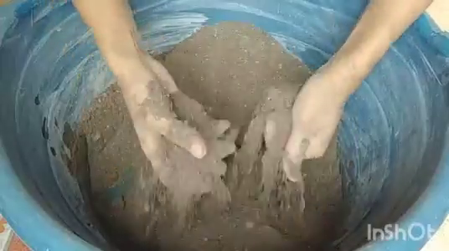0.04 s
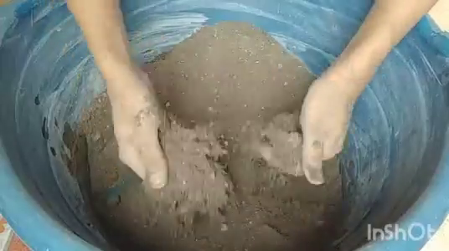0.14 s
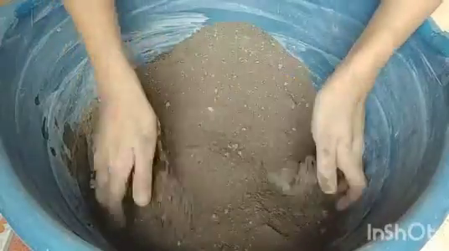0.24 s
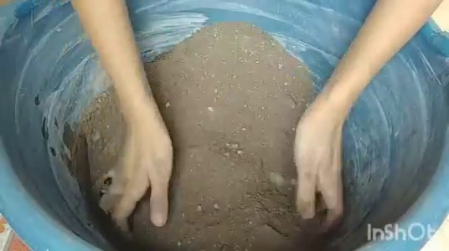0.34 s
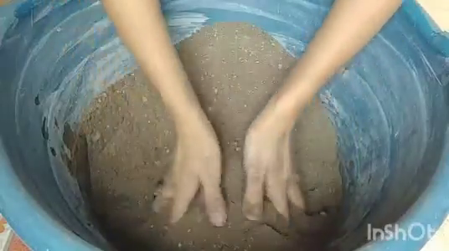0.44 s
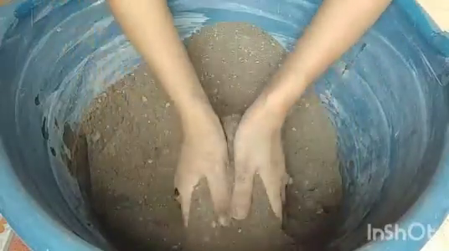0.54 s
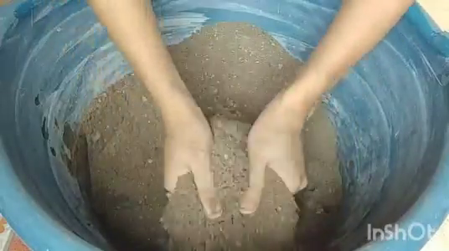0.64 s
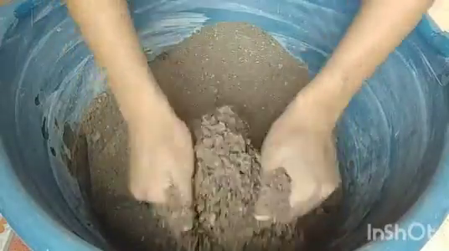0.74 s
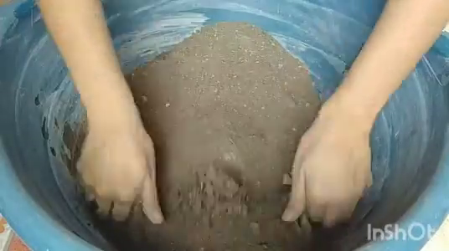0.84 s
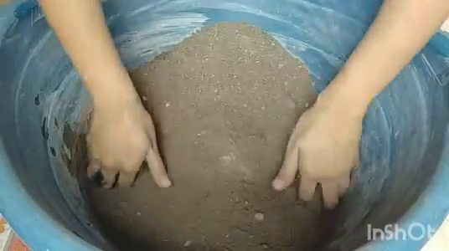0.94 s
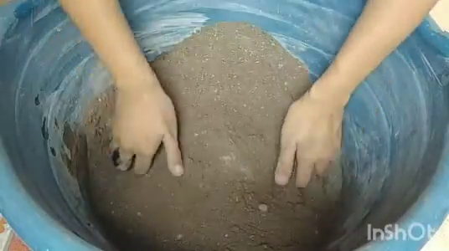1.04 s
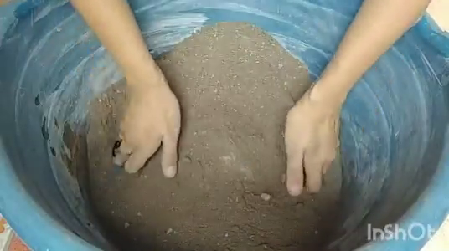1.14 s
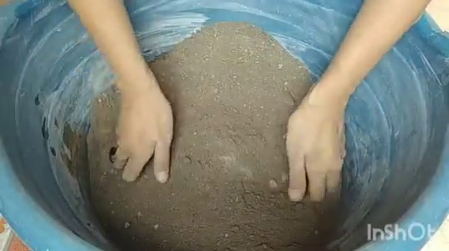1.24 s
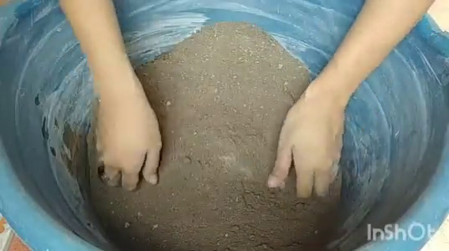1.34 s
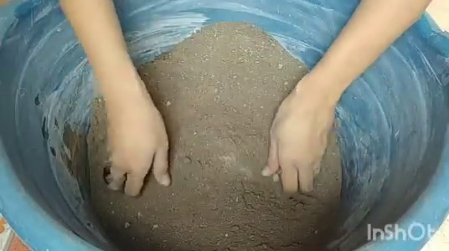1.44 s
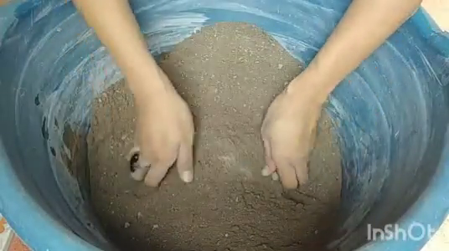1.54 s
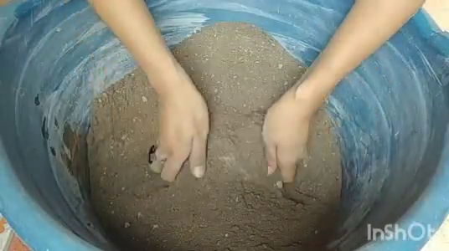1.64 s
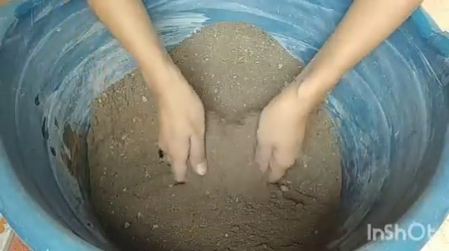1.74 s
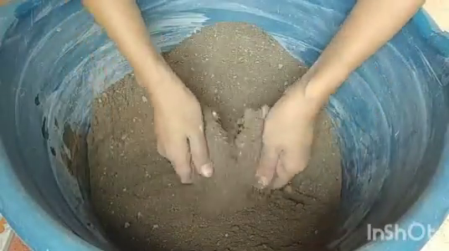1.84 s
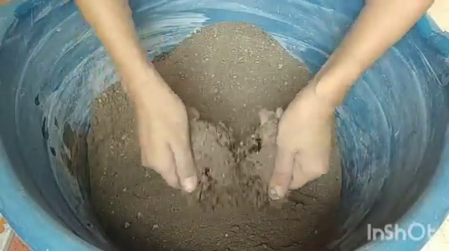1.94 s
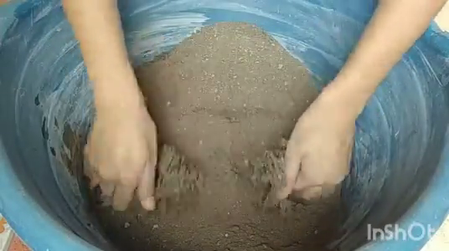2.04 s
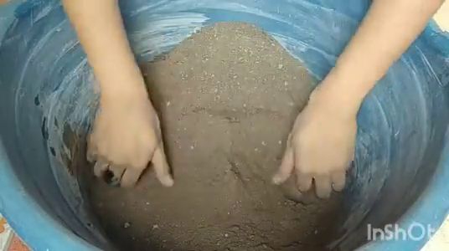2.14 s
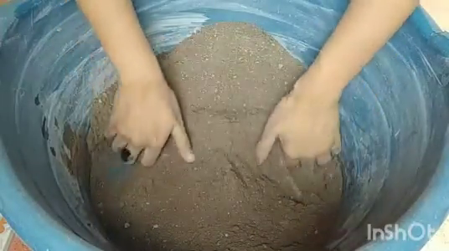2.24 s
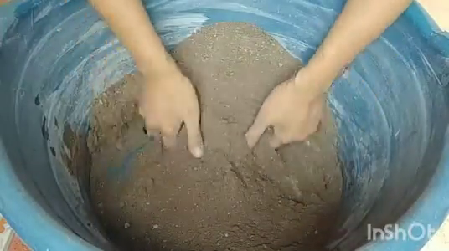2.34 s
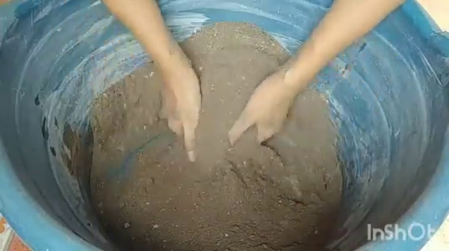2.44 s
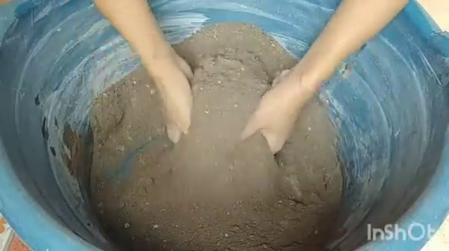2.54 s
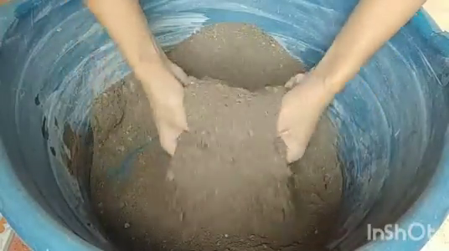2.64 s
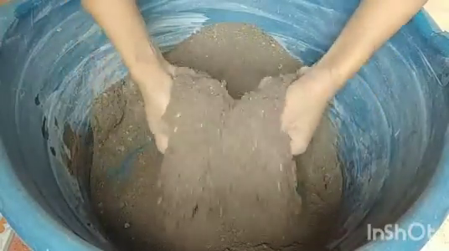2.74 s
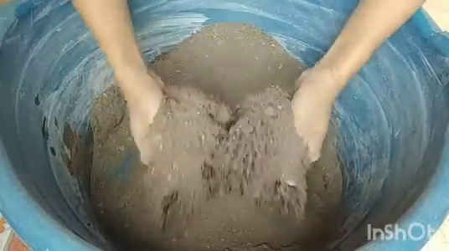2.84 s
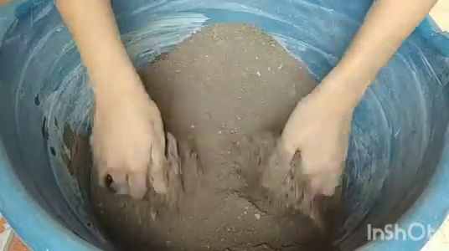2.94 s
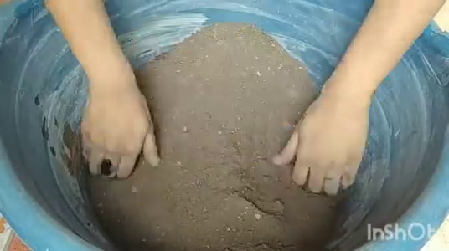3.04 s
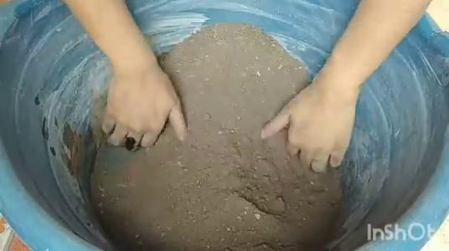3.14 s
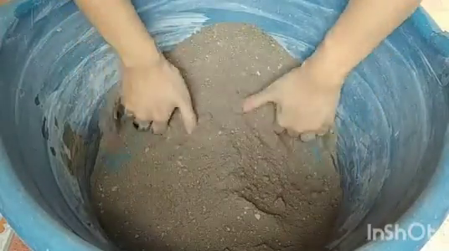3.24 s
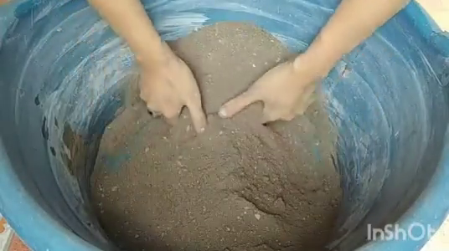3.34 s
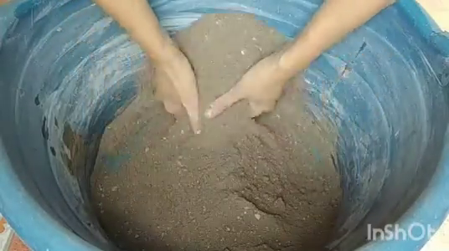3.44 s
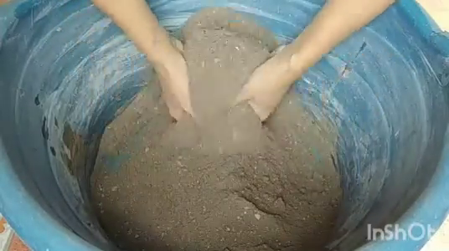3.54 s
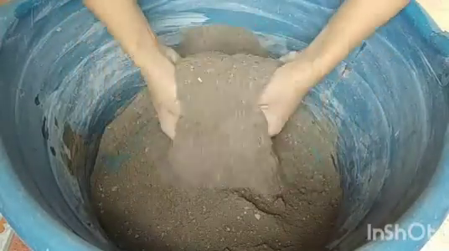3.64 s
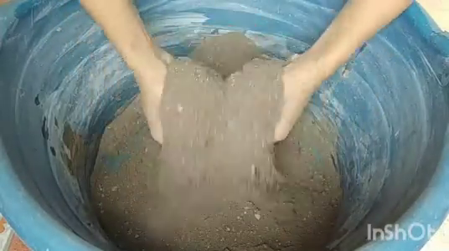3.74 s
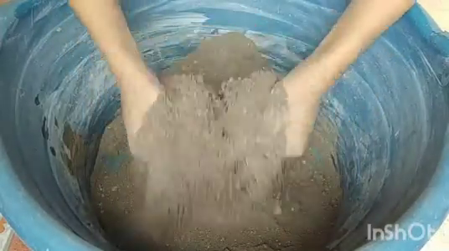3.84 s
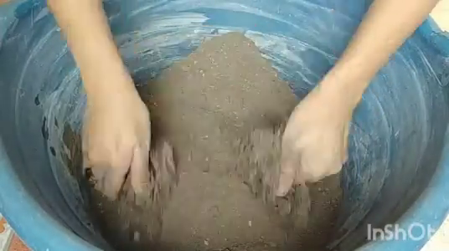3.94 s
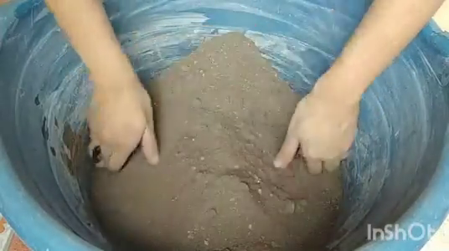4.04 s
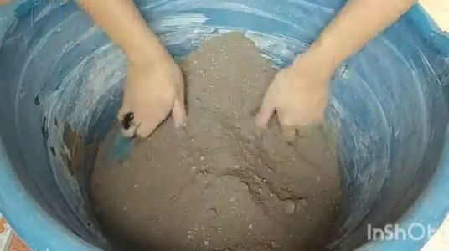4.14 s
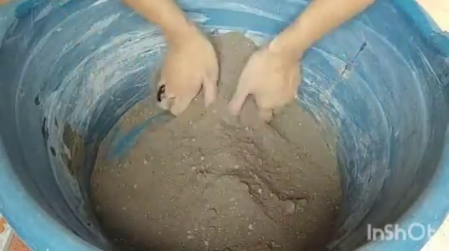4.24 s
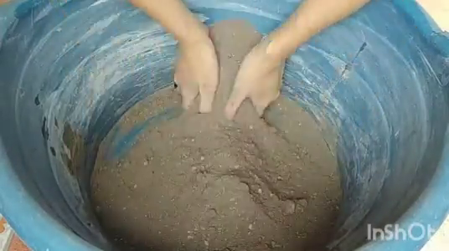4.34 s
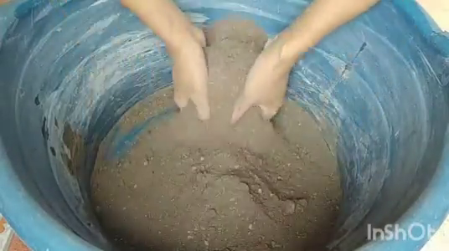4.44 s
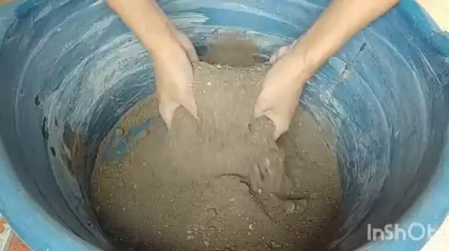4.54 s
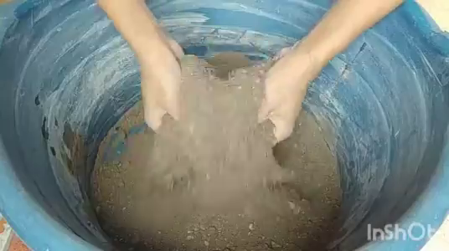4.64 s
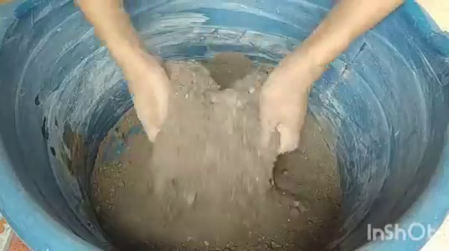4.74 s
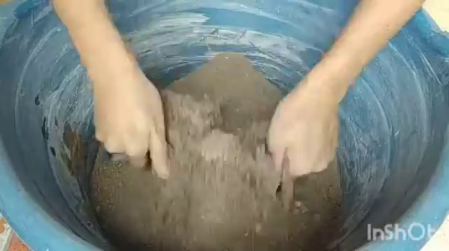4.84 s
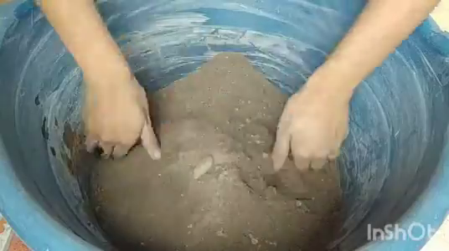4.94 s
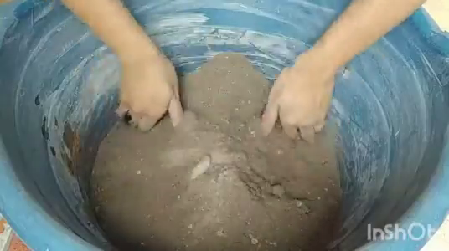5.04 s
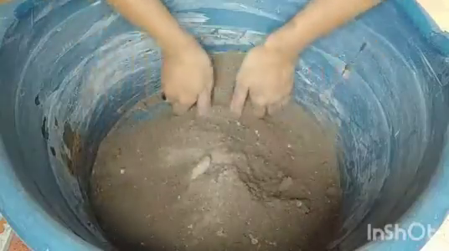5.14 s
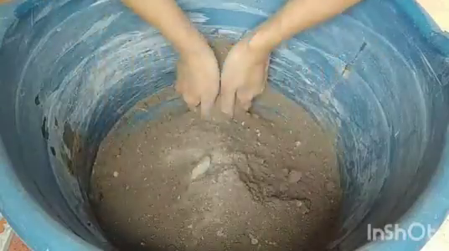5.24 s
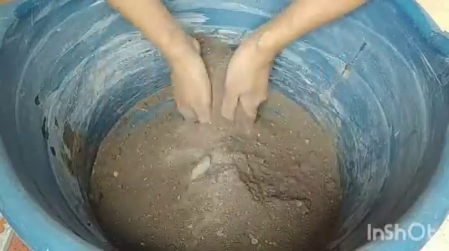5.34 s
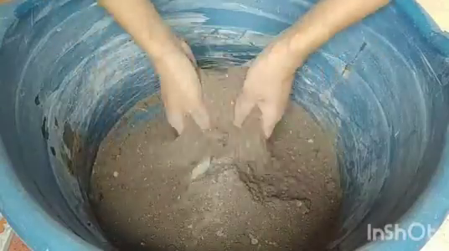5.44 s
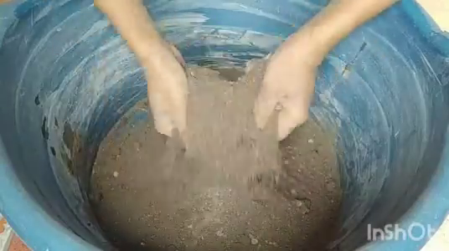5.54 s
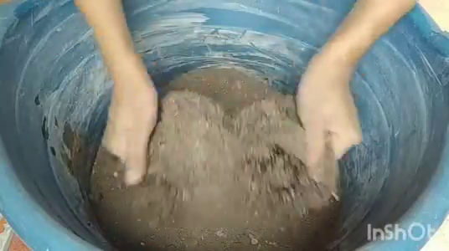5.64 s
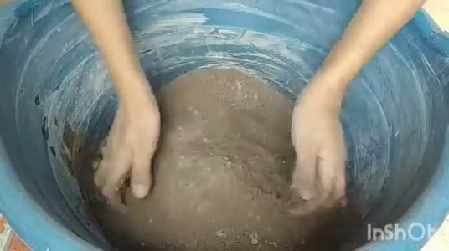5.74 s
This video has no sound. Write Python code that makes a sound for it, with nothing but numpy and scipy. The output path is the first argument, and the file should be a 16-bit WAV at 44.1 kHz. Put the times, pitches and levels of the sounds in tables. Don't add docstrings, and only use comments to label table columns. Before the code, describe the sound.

Gritty, crunching handfuls of sand are scooped and dropped in a hollow plastic tub, close up, over faint low machinery hum.

```python
import sys
import numpy as np
from scipy import signal
from scipy.fft import rfft, irfft, next_fast_len
from scipy.io import wavfile
from scipy.ndimage import uniform_filter1d, map_coordinates

SR = 44100
rng = np.random.default_rng(int(sys.argv[2]) if len(sys.argv) > 2 else 0)


def magnitude_from_level(level_db):
    exponent = np.asarray(level_db, float) / 20
    return 10 ** exponent


def bounce(signal):
    frames = np.transpose(np.atleast_2d(signal))
    limited = np.clip(frames, -1, 1)
    pcm = np.round(limited * 32767).astype(np.int16)
    wavfile.write(sys.argv[1], SR, pcm)


N = 254898


def unit(x):
    return x / np.sqrt(np.mean(x ** 2) + 1e-20)


def curves(rows):
    t_s, *columns = np.transpose(sorted(rows))
    return [np.interp(np.arange(N) / SR, t_s, column) for column in columns]


def wobble(rate_hz):
    knots = rng.standard_normal(int(N * rate_hz / SR) + 4)
    return map_coordinates(knots, [np.arange(N) * rate_hz / SR])


def coloured(x, spectrum):
    m = 2 ** 14
    f_hz, db = np.transpose(spectrum)
    hz = np.fft.rfftfreq(m, 1 / SR)
    gain = magnitude_from_level(np.interp(np.log(hz + 1), np.log(f_hz + 1), db))
    cepstrum = irfft(np.log(gain + 1e-6))
    cepstrum[1:m // 2] *= 2
    cepstrum[m // 2 + 1:] = 0
    return signal.fftconvolve(x, irfft(np.exp(rfft(cepstrum))))[:len(x)]


def tilted(x, pivot_hz, tilt_db):
    low = signal.sosfiltfilt(signal.butter(2, pivot_hz, fs=SR, output="sos"), x)
    return magnitude_from_level(-tilt_db / 2) * low + magnitude_from_level(tilt_db / 2) * (x - low)


def impact(peak_db, t60_s, t):
    return magnitude_from_level(peak_db - 60 * t / t60_s) * (1 - np.exp(-t / 0.00054))


# f/Hz, level/dB per Hz
ROOM_SPECTRUM = [(15, -49.5), (25, -28), (78, -1), (108, 2), (195, -15.5), (277, -15), (344, -15.5),
                 (754, -26), (1130, -34), (3340, -39), (4370, -33), (6050, -45.5), (9840, -50.5),
                 (14800, -49), (16000, -50)]
# t/s, level/dB
RUMBLE_LEVEL = [(0.0, -45.5), (0.11, -39.5), (0.32, -44), (0.43, -34), (0.68, -47), (0.92, -35),
                (1.69, -41.5), (2.45, -38.5), (2.99, -46), (3.07, -37.5), (3.94, -44.5), (4.18, -35.5),
                (4.77, -47), (5.1, -37), (5.78, -43.5)]


def room():
    rumble_db, = curves(RUMBLE_LEVEL)
    air = unit(coloured(rng.standard_normal(N), ROOM_SPECTRUM))
    low = signal.sosfiltfilt(signal.butter(2, 170, fs=SR, output="sos"), air)
    hiss_db = -45 + 0.36 * wobble(1.2)
    return magnitude_from_level(rumble_db + 1.4) * low + magnitude_from_level(hiss_db) * (air - low)


def drone():
    pitch_hz, wander_hz, level_db = 101.5, 2.5, -39
    start_s, end_s, fade_in_s = 1.7, 2.5, 0.4
    t = np.arange(N) / SR
    hz = pitch_hz + wander_hz / 2 * wobble(9)
    note = np.sin(2 * np.pi * np.cumsum(hz) / SR)
    gate = np.clip((t - start_s) / fade_in_s, 0, 1) * np.clip((end_s - t) * 40, 0, 1)
    return magnitude_from_level(level_db + 4 + 1.1 * wobble(14)) * gate * note


# t/s, f/Hz, level/dB
TRILL = [
    (2.55, 4680, -75),
    (2.57, 4758, -78),
    (2.736, 4766, -70),
    (2.77, 4751, -75),
    (2.97, 4796, -82),
    (2.98, 4853, -53),
]


def insect():
    hz, db = curves(TRILL)
    t = np.arange(N) / SR
    on = (t > TRILL[0][0]) & (t < TRILL[-1][0])
    return on * magnitude_from_level(db + 0.5 + 2.2 * wobble(60)) * np.sin(2 * np.pi * np.cumsum(hz) / SR)


# t/s, peak/dB, f/Hz, rattle over peak/dB, t60/s
TUB_KNOCKS = [(0.117, -18, 648, 0, 0.031), (0.344, -33, 280, -12, 0.028), (0.391, -19, 283, -25, 0.033),
              (0.907, -28, 262, -13, 0.022), (0.917, -12, 374, -4, 0.018), (0.924, -5.5, 718, -6.5, 0.024),
              (1.08, -13, 1187, -8.5, 0.035), (1.242, -37, 800, -2, 0.023), (1.497, -39, 293, -8, 0.04),
              (2.128, -32.5, 450, -5, 0.022), (2.136, -18.5, 299, -7, 0.029), (2.151, -18, 325, -3, 0.042),
              (2.274, -11, 1120, -7, 0.026), (3.051, -35.5, 221, 1, 0.022),
              (3.066, -20.5, 307, -14.5, 0.019), (3.173, -16, 1160, -14, 0.023),
              (4.036, -22, 700, 2, 0.025), (4.083, -12.5, 320, -14, 0.015), (4.987, -27.5, 340, 1, 0.03)]


def knocks():
    swing, rattle = np.zeros((2, N + SR))
    t = np.arange(SR // 5) / SR
    for at_s, peak_db, hz, rattle_db, t60_s in TUB_KNOCKS:
        start = round(at_s * SR)
        span = slice(start, start + len(t))
        fade = impact(peak_db, t60_s, t)
        band = signal.butter(2, [hz * 0.9, hz * 0.69 + 800], "band", fs=SR)
        modes = signal.lfilter(*band, rng.standard_normal(len(t)))
        swing[span] += fade * magnitude_from_level(2.0) * np.sin(2 * np.pi * hz * t)
        rattle[span] += fade * magnitude_from_level(rattle_db) * unit(modes)
    return swing[:N], rattle[:N]


# t/s, peak/dB, coarse over peak/dB
CLOD_HITS = [(0.101, -33, -7), (0.112, -30.5, -9), (0.3306, -35.5, -11), (0.3441, -29.5, 5),
             (0.3934, -21, 6), (0.7424, -24.5, -25), (0.7774, -29, -15), (0.7941, -19, -7.5),
             (0.8116, -6, -9.5), (0.8517, -11, -17), (0.9064, -25, -7.5), (0.9258, -3.5, -3.5),
             (0.9904, -4.5, -19), (1.2424, -34, 8), (1.499, -44, -8), (2.14, -18, -16), (2.1494, -9, -10.5),
             (2.9871, -22.5, -13), (3.0051, -15, -33.5), (3.053, -28, -9), (3.0837, -10.5, -1.5),
             (3.599, -25, -3), (3.9724, -38, -9), (3.9915, -16.5, -21.5), (4.0408, -7, -34),
             (4.9015, -33, -4), (4.9462, -18.5, -12), (4.9883, -12, -8), (5.0315, -10, -7),
             (5.7612, -6.5, -14.5)]
# f/Hz, level/dB per Hz
SNAP_SPECTRUM = [(350, -46), (600, -4.5), (3830, -2.5), (4460, 4), (5790, -12), (6920, -14.5), (8500, -40),
                 (12800, -36), (16000, -47)]


def clods():
    split_hz, t60_s = 3000, 0.021
    fine, coarse = np.zeros((2, N + SR))
    t = np.arange(SR // 5) / SR
    for at_s, peak_db, coarse_db in CLOD_HITS:
        start = round(at_s * SR)
        span = slice(start, start + len(t))
        burst = impact(peak_db, t60_s, t) * rng.standard_normal(len(t))
        fine[span] += magnitude_from_level(-5) * burst
        coarse[span] += magnitude_from_level(coarse_db - 1.5) * burst
    high = signal.sosfilt(signal.butter(4, split_hz, "high", fs=SR, output="sos"), fine[:N])
    low = signal.sosfilt(signal.butter(4, split_hz, "low", fs=SR, output="sos"), coarse[:N])
    tick = np.eye(1, 4096)[0]
    return coloured(high + low, SNAP_SPECTRUM) / np.linalg.norm(coloured(tick, SNAP_SPECTRUM))


# t/s, grit/dB, fall/s per 20 dB, coarseness/dB, wall push/dB
FINGER_DIGS = [(0.114, -46.5, 0.03, -1, 5.2), (0.331, -53, 0.23, -10.6, -4.3), (0.344, -41, 0.06, 2, -6),
               (0.391, -39.5, 0.07, 1, -0.4), (0.743, -38.5, 0.17, -8, -3.4),
               (0.806, -29.5, 0.06, -5.5, -9), (0.908, -31, 0.0626, -5, 8), (0.922, -23.5, 0.0914, -1, 11),
               (1.495, -51.0, 0.2, 2, 9.5), (2.14, -28, 0.11, -3.5, 4), (2.988, -43, 0.37, 0, -2.5),
               (3.056, -28.5, 0.13, -3.5, 4.5), (3.974, -37.5, 0.19, -8.3, -4),
               (3.993, -36, 0.073, -7.5, -6), (4.042, -26, 0.1558, -5, 7.5), (4.902, -39, 0.07, -10, 3),
               (4.948, -37.5, 0.03, -4, 2), (5.764, -27, 0.044, -5, -9.5)]
# t of top/s, grit/dB, rise/s, fall/s, coarseness/dB
PALM_SCOOPS = [
    (0.449, -34.5, 0.088, 0.088, 0.9),
    (1.005, -24.5, 0.1, 0.19, 1.5),
    (2.297, -26.5, 0.15, 0.16, 3),
    (3.248, -22.5, 0.2, 0.26, 1.8),
    (4.235, -21, 0.2, 0.17, 2.5),
    (5.04, -27, 0.098, 0.11, -2.2),
    (5.178, -21.5, 0.13, 0.128, 3),
]
# t/s, grit/dB, fall/s, coarseness/dB, wall push/dB
LUMP_BREAKS = [(0.474, -34, 0.018, -5.5, -23), (0.996, -22, 0.041, -3.7, -3),
               (1.088, -28.5, 0.059, 6.5, -0.4), (2.283, -28.5, 0.056, 13.5, 3),
               (2.35, -28.6, 0.057, 6, 2.5), (3.18, -27.5, 0.037, 12.5, 3.0), (4.145, -33.5, 0.1, 4, 12),
               (4.25, -25.5, 0.088, 8.5, -0.2), (4.336, -36.5, 0.063, -12, 3), (5.039, -20, 0.05, 1, -8),
               (5.116, -21.5, 0.073, 2.8, -4.5)]
# t/s, grit/dB, fall/s, coarseness/dB, wall push/dB
SAND_TRICKLES = [(0.021, -58.5, 0.102, -7.3, 2), (0.094, -55, 0.066, -7, -5), (0.24, -78, 0.114, -0.7, 11),
                 (0.721, -57.5, 0.068, -11.2, 3.3), (1.196, -40, 0.13, 0, 2.5), (1.308, -64, 0.16, -7, 13),
                 (1.388, -51, 0.055, 5, 4), (1.579, -52.5, 0.065, -1, -14), (1.849, -65, 0.196, 1.6, 4.0),
                 (2.014, -50.5, 0.123, -18, -2.5), (2.469, -47.5, 0.093, -6.0, 4),
                 (2.701, -72.5, 0.33, -1.1, 6), (3.498, -54, 0.11, -3, 5), (3.617, -43, 0.1, -1, 1.5),
                 (3.679, -57, 0.17, -3, 1), (4.429, -46.5, 0.095, -6.5, -2), (4.546, -49, 0.102, -1, 1.5),
                 (4.657, -60.5, 0.069, 4, -6), (4.751, -67.5, 0.154, -3, -4), (5.327, -40, 0.1, -3, -3.5),
                 (5.44, -41, 0.14, -3, -2.3), (5.529, -50, 0.094, -4, -2.5), (5.656, -57, 0.17, -5, 1)]
# rise roundness, fall roundness, wall/dB, fizz over grit/dB, small-clump tilt/dB, high-mode tilt/dB
DIG = (0.8, 1.6, -10.5, -18.5, -8, -11.5)
SCOOP = (2.5, 2, -9, -17.5, 2, 0)
LUMP = (1.8, 1.64, -3.5, -20, 3.5, 12)
TRICKLE = (1.97, 1.3, -9, -25, -4.5, -3)


def gestures():
    stab_rise_s, lump_rise_per_fall, trickle_rise_per_fall = 0.005, 0.68, 0.92
    full_db, wall_grows, fizz_grows, dust = -26, 0.68, 1.08, 0.71
    rows = [(s, db, stab_rise_s, *rest, *DIG) for s, db, *rest in FINGER_DIGS]
    rows += [(*event, 0, *SCOOP) for event in PALM_SCOOPS]
    rows += [(s, db, lump_rise_per_fall * fall, fall, *rest, *LUMP) for s, db, fall, *rest in LUMP_BREAKS]
    rows += [(s, db, trickle_rise_per_fall * fall, fall, *rest, *TRICKLE)
             for s, db, fall, *rest in SAND_TRICKLES]
    columns = np.transpose(rows)[:, :, None]
    s, db, rise, fall, coarse, push, swell, sink, wall, fizz, small, panel = columns
    t = np.arange(0, N + 64, 32) / SR
    before = t < s
    distance = abs(t - s) / np.where(before, rise, fall)
    over = db - full_db - 20 * distance ** np.where(before, swell, sink)
    layers_db = [over + coarse, over, wall_grows * over + wall + push, fizz_grows * over + fizz - dust * coarse]
    power = magnitude_from_level(2 * np.array(layers_db)) + 1e-12
    small_db = (small * power[0]).sum(0) / power[0].sum(0)
    panel_db = (panel * power[2]).sum(0) / power[2].sum(0)
    levels_db = full_db + 10 * np.log10(power.sum(1))
    return curves(zip(t, *levels_db, small_db, panel_db))


def grains(spread_db, patchy_db):
    size = np.minimum(rng.exponential(size=N), 3.2)
    slips = rng.standard_normal(N) * magnitude_from_level(spread_db * size)
    z = signal.stft(slips, nperseg=128)[2]
    field = uniform_filter1d(rng.standard_normal(z.shape), 2, 0)
    field = uniform_filter1d(field, 3, 1)
    return signal.istft(z * magnitude_from_level(patchy_db * unit(field)), nperseg=128)[1][:N]


# f/Hz, width/Hz, level/dB
TUB_MODES = [(174, 47, -7), (292.3, 44, -1.5), (331, 59.5, -2), (539, 177, -7), (662, 151, -1.5),
             (783, 252, -4), (1080, 310, -9.5)]


def tub_wall(clumps, panel_db):
    x = magnitude_from_level(1.7 * clumps) * grains(spread_db=4.0, patchy_db=3.0)
    m = next_fast_len(N + SR // 2)
    f = np.fft.rfftfreq(m, 1 / SR)
    gain = 0
    for k, (hz, width_hz, db) in enumerate(TUB_MODES):
        damping = 1j * f * width_hz
        gain = gain + (-1) ** k * magnitude_from_level(db) * damping / (hz * hz - f * f + damping)
    return tilted(unit(irfft(rfft(x, m) * gain, m)[:N]), 464, panel_db)


# f/Hz, level/dB per Hz
CRUNCH_SPECTRUM = [(410, -30.5), (700, -11), (1360, 1.5), (1770, -2), (1860, 0), (2380, 2), (4000, -8),
                   (5200, -36), (8800, -120)]


def crunch(clumps, small_db):
    coarse = coloured(grains(spread_db=4.0, patchy_db=1.5), CRUNCH_SPECTRUM)
    return tilted(unit(magnitude_from_level(clumps + wobble(70)) * coarse), 1900, small_db)


# f/Hz, level/dB per Hz
GRIT_SPECTRUM = [(1470, -35.5), (2500, -15.5), (3360, -8), (3900, -4.5), (4260, 1), (5030, -8.5),
                 (5220, -10.5), (5540, -14.5), (6870, -26), (7500, -38.5), (9750, -51), (16500, -120)]


def grit(clumps, fine):
    return unit(magnitude_from_level(0.47 * clumps + 0.74 * wobble(70)) * coloured(fine, GRIT_SPECTRUM))


# f/Hz, level/dB per Hz
FIZZ_SPECTRUM = [(3530, -16.5), (6000, -3.5), (6840, -3), (8610, -17), (10400, -24), (13200, -20.5),
                 (16000, -31.5)]


def fizz(clumps, fine):
    dust = fine + 0.49 * grains(spread_db=3.0, patchy_db=2.5)
    return unit(magnitude_from_level(0.25 * clumps + 1.8 * wobble(60)) * coloured(dust, FIZZ_SPECTRUM))


def sand():
    crunch_db, grit_db, wall_db, fizz_db, small_db, panel_db = gestures()
    clumps = 0.45 * wobble(60) + wobble(180)
    fine = grains(spread_db=2.0, patchy_db=1.0)
    flow = magnitude_from_level(crunch_db - 2.16) * crunch(clumps, small_db)
    flow += magnitude_from_level(grit_db - 0.78) * grit(clumps, fine)
    flow += magnitude_from_level(wall_db - 3.0) * tub_wall(clumps, panel_db)
    flow += magnitude_from_level(fizz_db + 1.5) * fizz(clumps, fine)
    return flow


def walls(x, t60_s, spectrum):
    t = np.arange(SR // 2) / SR
    tail = rng.standard_normal(len(t)) * magnitude_from_level(-60 * t / t60_s) * (t > 0.002)
    tail = coloured(tail, spectrum)
    return signal.fftconvolve(x, tail / np.linalg.norm(tail))[:N]


# f/Hz, level/dB
ECHO_SPECTRUM = [(100, -24.5), (300, 6), (1200, -2), (2500, -13), (5000, -14.5), (9000, -41)]


def scene():
    swing, rattle = knocks()
    flow = sand()
    hits = clods() + rattle
    hollow = walls(magnitude_from_level(-10.5) * flow + magnitude_from_level(-16) * hits, t60_s=0.053, spectrum=[(100, 0), (16000, 0.0094)])
    to_room = magnitude_from_level(-20) * flow + magnitude_from_level(-12.5) * hits + magnitude_from_level(-19.5) * swing
    far = walls(to_room, t60_s=0.28, spectrum=ECHO_SPECTRUM)
    return (flow + hits + swing + hollow + far + room() + insect() + drone())[None]


def low_pass(x):
    return signal.sosfilt(signal.butter(12, 16380, fs=SR, output="sos"), x)


def record(dry):
    ceiling, bass_hz, top_hz = 0.93, 48, 15830
    x = dry / (1 + abs(dry / ceiling) ** 8) ** (1 / 8)
    x = signal.sosfilt(signal.butter(2, bass_hz, "high", fs=SR, output="sos"), x)
    x = irfft(rfft(x) * (np.fft.rfftfreq(N, 1 / SR) < top_hz), N)
    return low_pass(x)


dry = scene()
out = record(dry)
bounce(out)
```